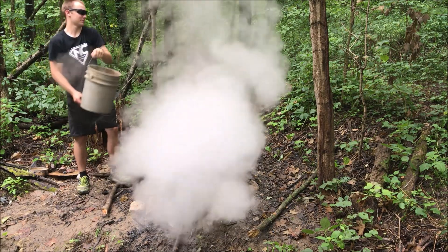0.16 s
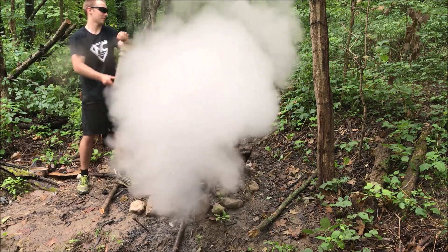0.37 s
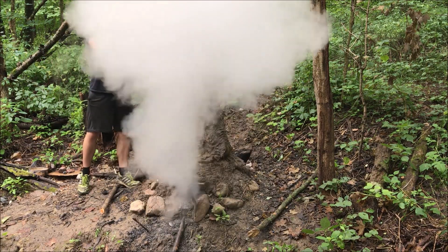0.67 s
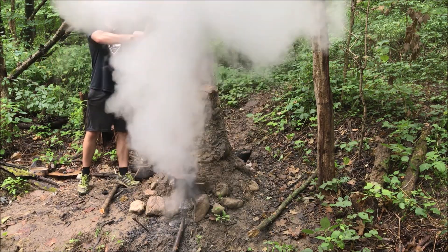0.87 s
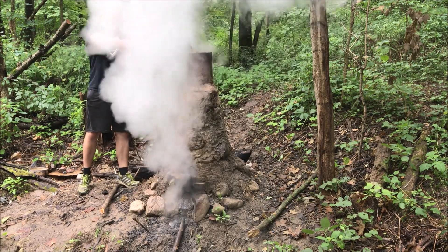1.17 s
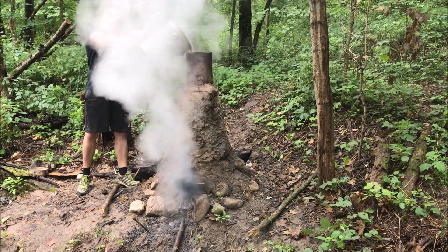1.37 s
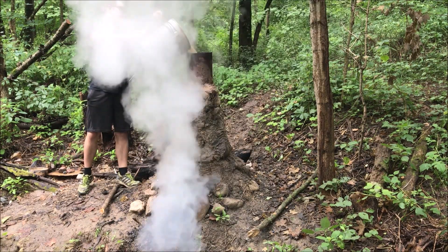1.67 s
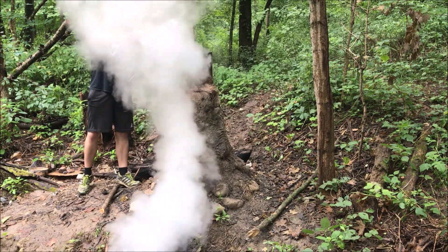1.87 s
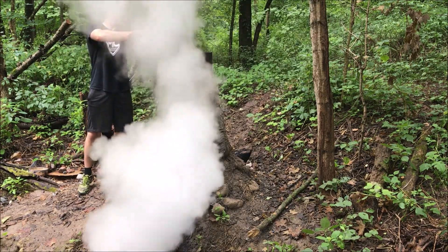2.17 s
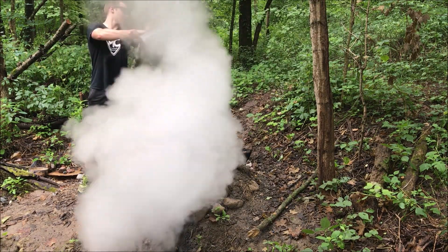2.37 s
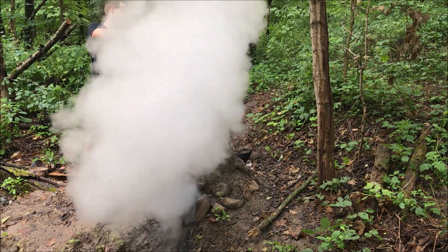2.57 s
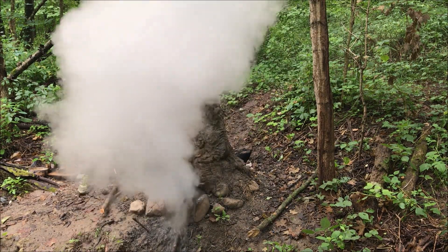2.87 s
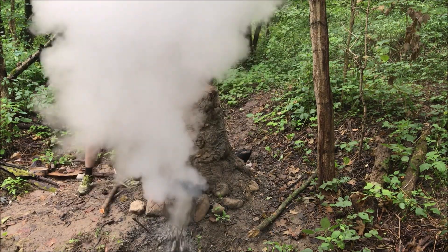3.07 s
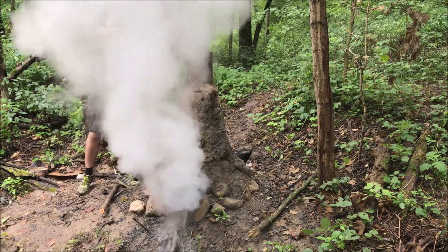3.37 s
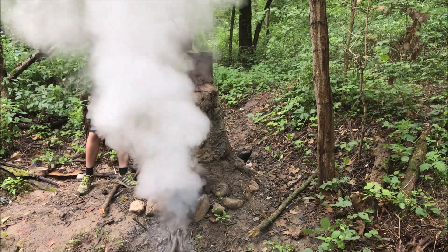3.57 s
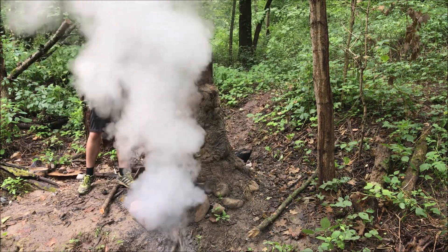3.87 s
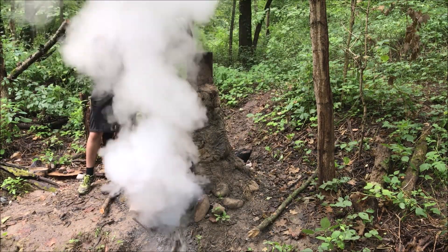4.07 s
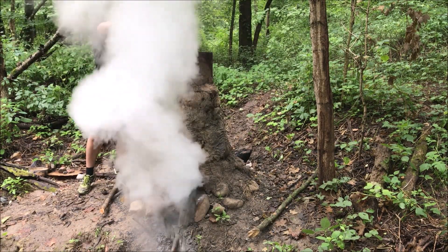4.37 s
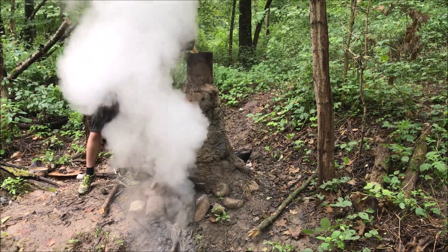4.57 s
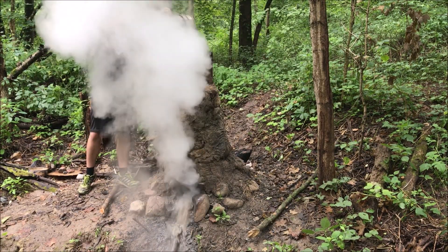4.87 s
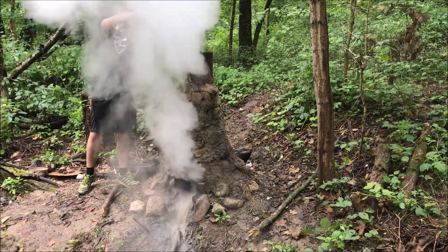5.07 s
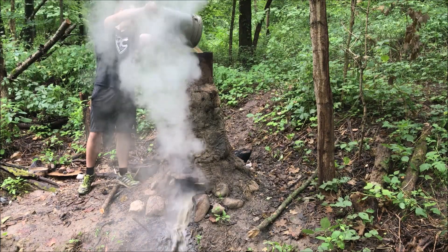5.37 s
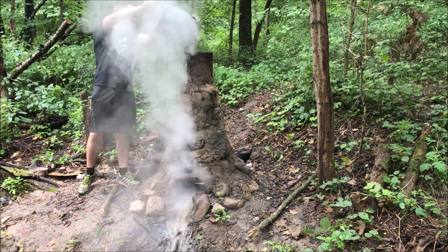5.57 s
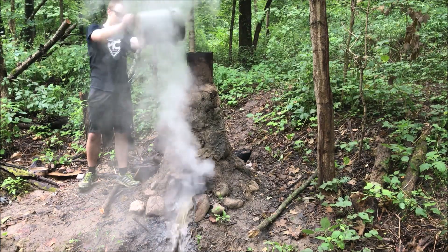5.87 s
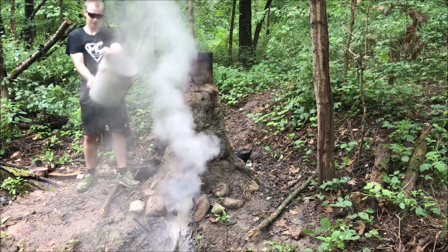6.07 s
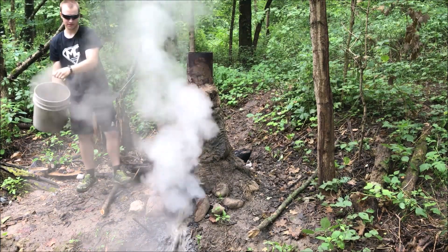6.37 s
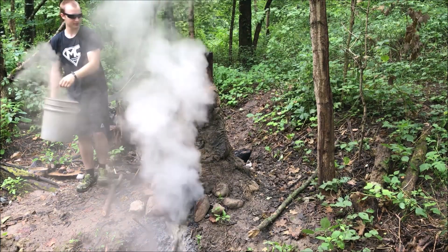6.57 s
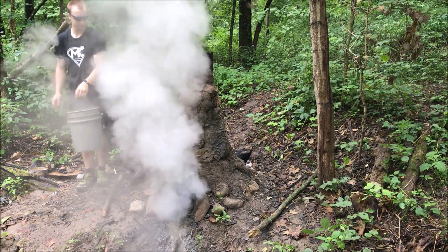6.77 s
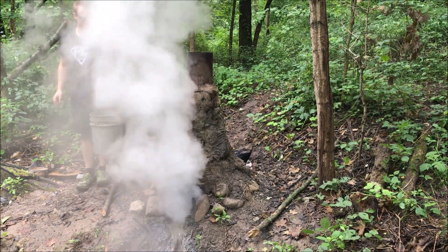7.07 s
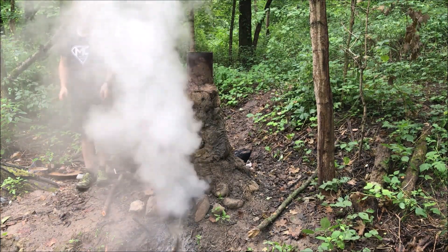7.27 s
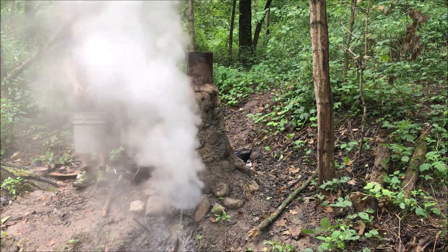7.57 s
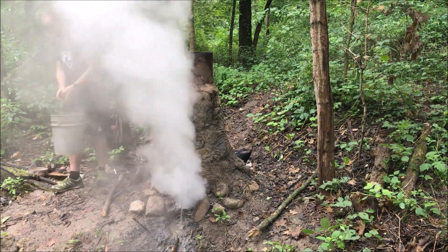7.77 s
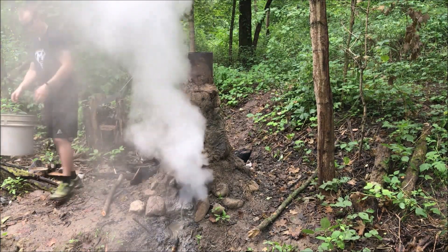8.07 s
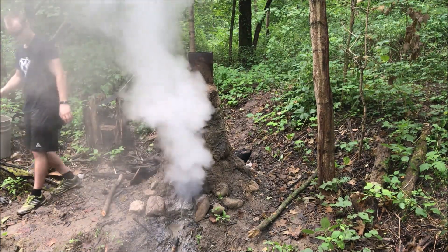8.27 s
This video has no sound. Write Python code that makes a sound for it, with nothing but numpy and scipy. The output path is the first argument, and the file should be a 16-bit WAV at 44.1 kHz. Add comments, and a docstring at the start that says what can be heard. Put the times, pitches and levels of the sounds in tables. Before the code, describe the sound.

A faint simmering hiss over very quiet woodland rustle opens the scene, with two tiny rock ticks at 0.3 and 0.6 s. At about 1.05 s water strikes red-hot stones: a snap and pops, then rumbling, gurgling boil and gushes of spitting steam. A violent cluster of cracks and hollow steam bursts peaks around 1.65 s, with scattered pops to 2.5 s. Faint falling whistles come near 2.7 s; a hard pop at 3.2 s is followed at once by a thin, dipping and rising bird chirp. A dense volley of thumps and cracks runs 3.8-4.1 s as the sizzle grows brighter. Two snaps come near 4.5 s. Pouring stops around 5.4 s; the boil fades while hiss persists. At 6.2-6.3 s a wire handle clacks and bounces on the hollow plastic pail. Sparse ticks punctuate the sizzle, fading by 8.4 s. Close outdoor microphone, little reverberation.

```python
"""Water poured from a bucket boils on red-hot rocks in a fire pit: collapsing bubbles rumble as filtered clicks.
Steam hisses as patchy noise with ticking drops; trapped steam bursts as single air swings off a tree stump.
Splitting rocks ring in decaying modes with noisy chips, and the handle clacks on the ringing pail.
A small bird chirps in gliding whistles, after faint falling tones, over the faint noise of the wood."""
import sys
import numpy as np
from scipy import signal
from scipy.fft import rfft, irfft, next_fast_len
from scipy.io import wavfile
from scipy.ndimage import uniform_filter1d, map_coordinates

SR = 44100
rng = np.random.default_rng(int(sys.argv[2]) if len(sys.argv) > 2 else 0)


def unload_audio(sound):
    """Save the sound as a 16-bit wav file, at the path given as the first command line argument."""
    columns = np.transpose(np.atleast_2d(sound))
    # keep every value between -1 and 1, then stretch to whole-number steps
    steps = np.round(np.clip(columns, -1, 1) * 32767)
    wavfile.write(sys.argv[1], SR, steps.astype(np.int16))


N = 371763
TOP_HZ = 15850  # upper band limit of the microphone, and the highest drop pitch


# Tone of the rumbling bubbles: freq_hz, relative_density_db
BOIL_SPECTRUM = [(24, -71), (40, -39), (99, -3.5), (135, -7), (326, 4), (358, 4.5), (473, -8), (519, -6.5),
                 (763, -11.5), (837, -26), (1090, -12.5), (1270, -58), (1600, -28), (2080, -22),
                 (3520, -120)]


def boiling():
    """While the water runs, big vapour bubbles collapse with a rumble and it spatters in the hollows."""
    pour_start_s, pour_end_s = 1.051, 5.43
    boil_db, simmer_db = -44.5, -66.5  # the simmer is a floor under the whole scene
    attack_s, sag_db_per_s, release_db_per_s = 0.018, 0.3, 16
    t = np.arange(N) / SR
    attack = np.clip((t - pour_start_s) / attack_s, 0, 1)
    sag_db = sag_db_per_s * (t - pour_start_s)
    release_db = release_db_per_s * np.maximum(t - pour_end_s, 0)
    _, gush_db = swells()
    boil = attack * amp(boil_db - (sag_db + release_db) + gush_db)
    level = np.hypot(boil, amp(simmer_db))

    heave_db = 1.6 * wobble(14)
    rumble = amp(heave_db) * coloured(kicks(rate=400, spread_db=3), BOIL_SPECTRUM)
    slosh_db = 2.3 * wobble(35)
    spatter = amp(-4.0 + slosh_db) * unit(filtered(kicks(rate=600, spread_db=3.5), pit))
    return level * (rumble + spatter)


# The sizzle grows as more stone gets wet, then dies away: time_s, level_db
SIZZLE_LEVEL = [(0, -58.5), (.98, -58.5), (1.08, -53.5), (2.45, -51.5), (2.7, -48.5), (3.9, -44),
                (5.05, -44.5), (5.45, -42.5), (6.45, -44.5), (7.05, -46.5), (8.05, -56), (8.43, -58)]
# Tone of the steam hiss: freq_hz, relative_density_db
HISS_SPECTRUM = [(60, -36), (410, -11), (700, -4), (850, -7), (955, -3), (1430, -3.5), (1730, -1),
                 (3320, 0.5), (4520, 0.5), (5150, 0), (7700, 1), (9720, -11.5), (12100, -17.5),
                 (15500, -27)]
# Tone of the fine spray: freq_hz, relative_density_db
SPRAY_SPECTRUM = [(3000, -5), (7000, -2.5), (9000, 7.5), (9900, 3), (11000, 8.5), (12200, 7.5),
                  (14000, 6.5), (15800, 1)]
# Brief dropouts in the level of the hiss, spray and drops: centre_s, half_length_s, change_db
HISS_DROPOUTS = [(2.369, .007, -15), (2.828, 0.015, -8), (6.729, 0.02, -6.5), (7.373, 0.0078, -4),
                 (7.833, .009, -4), (7.96, 0.0093, -5)]


def sizzling():
    """Steam hisses off the stone, with fine spray above it, drops spitting and sparse sharp ticks."""
    sizzle_db, = curves(SIZZLE_LEVEL)
    gush_db, _ = swells()
    over_db = sizzle_db + 44.5  # relative to the sizzle level at which spray_db and spit_db hold
    hiss = amp(sizzle_db + gush_db) * rush(HISS_SPECTRUM, patchy_db=1.2)

    mist = coloured(kicks(rate=4000, spread_db=6), SPRAY_SPECTRUM)
    vapour = rush(SPRAY_SPECTRUM, patchy_db=.6)
    flutter_db = .8 * wobble(14)
    spray_db = -44.5 + 0.77 * over_db  # dB per dB of sizzle
    fizz = amp(spray_db + gush_db + flutter_db) * unit(vapour + 0.97 * mist)

    drops = droplets(rate=300, centre_hz=4006, scatter=0.45, cycles=18.0, spread_db=2.0)
    ticks = droplets(rate=100, centre_hz=7500, scatter=.38, cycles=1.8, spread_db=4.5)
    sputter_db = 2.2 * wobble(28)
    spit_db = -49 + 0.91 * over_db
    gush_share = .7  # how much of a gush's swell the drops follow
    spit = amp(sputter_db + spit_db + gush_share * gush_db) * unit(drops + ticks)

    t = np.arange(N) / SR
    dropout_db = sum(db * np.exp(-((t - s) / half_s) ** 2) for s, half_s, db in HISS_DROPOUTS)
    return (hiss + fizz + spit) * amp(.55 * wobble(25) + dropout_db)


def droplets(rate, centre_hz, scatter, cycles, spread_db):
    """Drops flashing to steam: each a sine tick that decays over a number of cycles, about rate a second."""
    count = 6000  # candidates, of which a random share sounds
    draw, t = rng.standard_normal((count, 2)), np.arange(SR // 300) / SR
    start, chance = rng.random((2, count))
    hz = np.clip(centre_hz * np.exp(scatter * draw[:, :1]), 900, TOP_HZ)
    sounds = (chance < rate * N / SR / count)[:, None]
    size = amp(spread_db * np.minimum(draw[:, 1:], 2)) * sounds
    ticks = size * np.sin(2 * np.pi * hz * t) * np.exp(-hz * t / cycles)
    where = (start * N).astype(int)[:, None] + np.arange(len(t))
    return unit(np.bincount(where.ravel(), ticks.ravel(), N)[:N])


# Gushes of water reaching hot stone: centre_s, half_length_s, sizzle_change_db, boil_change_db
WATER_GUSHES = [(.47, 0.19, 2.5, 0), (1.133, 0.1, 8, 6.5), (1.34, 0.094, 6.5, 4.5), (1.663, 0.05, 9.5, 5.5),
                (1.86, 0.081, 4.5, 9), (2.138, 0.098, 8, 3), (3.3, 0.092, 1, 2), (3.992, 0.062, -2.5, 13.5)]


def swells():
    """Bell-shaped level changes in dB that the gushes give to the sizzle and to the boiling."""
    t = np.arange(N) / SR
    return sum(np.outer([sizzle_db, boil_db], np.exp(-((t - s) / half_s) ** 2))
               for s, half_s, sizzle_db, boil_db in WATER_GUSHES)


# Steam bursts: start_s, level_db, pitch_hz, front_edge_hz, spatter_db
STEAM_BURSTS = [(1.063, -23.5, 382, 1100, -26), (1.078, -37, 478, 1400, -23), (1.095, -31, 400, 1600, -25),
                (1.098, -32, 150, 800, -30), (1.3, -31, 140, 700, -43), (1.398, -25, 270, 700, -42),
                (1.6243, -16, 340, 1000, -23), (1.6404, -28, 330, 1100, -36),
                (1.6588, -12.5, 250, 800, -23), (1.669, -3.5, 475, 1100, -22),
                (1.6825, -16, 623, 1600, -19), (1.69, -23, 455, 1400, -18), (1.9174, -22, 330, 550, -50),
                (1.9327, -22, 380, 600, -48), (2.0837, -25.5, 380, 1200, -27),
                (2.0942, -15, 434, 1900, -20.5), (2.319, -26, 438, 1600, -28),
                (3.21, -11.5, 477, 1700, -29), (3.655, -39, 620, 1200, -30),
                (3.8077, -11.5, 390, 1900, -12), (3.8253, -7.5, 250, 1100, -15),
                (3.8129, -21, 110, 400, -34), (3.8329, -12.5, 140, 400, -20),
                (3.8472, -15.5, 170, 900, -30), (3.8548, -14.5, 433, 1700, -22),
                (3.8704, -16.5, 440, 1200, -24), (3.877, -27, 350, 1100, -24), (3.958, -26, 270, 550, -42),
                (3.9665, -16.5, 185, 650, -26), (3.979, -27, 250, 800, -33), (3.993, -20, 200, 600, -25),
                (4.0046, -9, 125, 520, -17), (4.019, -30, 110, 500, -32), (4.037, -30, 130, 900, -33),
                (4.062, -25, 360, 1100, -20), (4.08, -14.5, 383, 1200, -37)]
# Tone of the water spat out by a burst: freq_hz, relative_level_db
SPATTER_SPECTRUM = [(60, -30), (300, 15), (1100, 13), (1400, -17), (1900, 6), (2300, -12), (3100, -3),
                    (3900, -2), (14000, -36)]


def bursts():
    """Trapped steam lets go: the air swings once, the stump returns it and water spatters."""
    vent_hz = 85  # a small steam vent radiates little below this
    stump_s, stump_share = 0.002787, 0.55  # echo delay and strength
    stump_low_hz, stump_top_hz = 263, 2200  # longer waves pass round it, shorter ones scatter off its bark
    out, t = np.zeros(N), np.arange(SR // 12) / SR
    for s, db, hz, front_hz, spatter_db in STEAM_BURSTS:
        delay_s = stump_s * rng.normal(1, .025)

        def path(f):
            echo_band = f ** 4 / (f ** 4 + stump_low_hz ** 4) / (1 + 1j * f / stump_top_hz)
            stump = 1 + stump_share * np.exp(-2j * np.pi * f * delay_s) * echo_band
            soften = 1 / (1 + 1.2j * f / front_hz - (f / front_hz) ** 2)  # a low edge blunts the front
            thin = f * f / (f * f + vent_hz ** 2)
            return stump * (1 + .42 * pit(f)) * soften * thin

        push = filtered(swing(t, hz), path)
        spray = rng.standard_normal(len(t)) * amp(-60 * t / .022)
        spray = filtered(spray, lambda f: amp(along(SPATTER_SPECTRUM, f)))
        add(out, s, amp(db) * peaked(push) + amp(spatter_db) * peaked(spray))
    return out


def swing(t, hz):
    """One swing of the air about a pitch: three lobes with no net flow."""
    u = 2 * np.pi * hz * t
    return u * (u * u - 6 * u + 6) * np.exp(-u)


# Rocks cracking: start_s, pitch_hz, ring_db, chips_db, knock_db, chips_t60_s
ROCK_CRACKS = [(0.329, 2800, -36.5, -37, -39.5, 0.014), (0.616, 2330, -39, -48, -60, .018),
               (1.092, 3230, -24, -23, -21.5, 0.035), (1.5943, 2880, -36, -25, -30, 0.022),
               (1.608, 2930, -31, -26, -27, 0.017), (1.6541, 3120, -17.5, -17, -10.5, 0.014),
               (1.6585, 3020, -25, -19, -27, 0.0089), (1.662, 3500, -25, -15, -17, 0.014),
               (1.6685, 3030, -27, -22, -38, 0.011), (1.6715, 3040, -25, -26, -40, .012),
               (1.683, 2970, -27, -32, -33, .01), (1.6867, 3100, -23, -21, -29, 0.025),
               (1.767, 2370, -33, -27.5, -47, .012), (1.7903, 2810, -29, -28, -28, .014),
               (1.8075, 2530, -30, -32, -33, 0.014), (1.8877, 1840, -30, -34, -34, 0.02),
               (1.9301, 2300, -19.5, -19.5, -24, 0.028), (1.9326, 3670, -22, -24, -34, 0.026),
               (2.0888, 3000, -30, -21.5, -26, 0.017), (2.3353, 2450, -23, -24, -27, 0.02),
               (2.341, 2760, -31, -23, -28, .018), (2.481, 3100, -35, -36, -55, .018),
               (3.2102, 2630, -21, -32, -31, 0.0099), (3.801, 2620, -29, -20.5, -24, 0.019),
               (3.8078, 1920, -19.5, -19, -23, 0.014), (3.8161, 3020, -35, -25, -16, 0.024),
               (3.825, 1910, -22, -21, -30, 0.0081), (3.842, 3080, -28, -27, -24, 0.014),
               (3.846, 2030, -25, -29, -19.5, 0.016), (3.856, 1930, -22, -30, -34, .018),
               (3.89, 1490, -27, -40, -25, .02), (3.998, 2520, -31, -20, -19, 0.017),
               (4.0024, 3030, -28, -22, -14.5, 0.015), (4.042, 2570, -30, -32, -31, .02),
               (4.062, 2480, -27, -25, -23, 0.018), (4.0728, 2140, -14.5, -17, -17, 0.017),
               (4.0797, 1960, -17, -17, -23, 0.02), (4.5133, 2220, -24.5, -28, -40, 0.013),
               (4.576, 4500, -27.5, -29, -55, 0.022), (5.561, 3970, -31, -34, -61, 0.013),
               (6.8625, 2310, -33, -32, -55, .02), (7.214, 2340, -23.5, -23, -46, 0.014),
               (7.8864, 5000, -37, -26.5, -51, 0.019), (7.929, 5070, -42, -39, -55, 0.011)]
# Modes of a rock: ratio_to_pitch, relative_level_db, t60_s
ROCK_MODES = [(.55, -31, .014), (.8, -24, .015), (1.001, 11, 0.028), (1.16, 6, 0.016), (1.6, -2, 0.0087)]
# Tone of the flying chips: freq_hz, relative_level_db
CHIPS_SPECTRUM = [(500, -39), (1900, 7), (3000, 1.5), (4000, 2), (6000, -2.5), (14000, -5.5)]


def cracks():
    """A chilled rock splits: its modes ring briefly, chips fly and the pit knocks."""
    out, t = np.zeros(N), np.arange(SR // 12) / SR

    def mode(hz, level_db, t60_s):
        decay = amp(level_db + 2 * rng.standard_normal() - 60 * t / t60_s)
        return decay * np.sin(2 * np.pi * hz * rng.normal(1, .014) * t)

    for s, hz, ring_db, chips_db, knock_db, t60_s in ROCK_CRACKS:
        ring = sum(mode(hz * ratio, level_db, life_s) for ratio, level_db, life_s in ROCK_MODES)
        spread = 1 - np.exp(-t / (0.2 * t60_s))  # a long split takes a moment to run through the stone
        rough_db = 3.4 * rng.standard_normal(len(t))
        grit = rng.standard_normal(len(t)) * spread * amp(rough_db - 60 * t / t60_s)
        knock = filtered(grit, lambda f: pit(f) / (1 + 1j * f / 1500))
        chips = filtered(grit, lambda f: amp(along(CHIPS_SPECTRUM, f)))
        add(out, s, amp(ring_db) * peaked(ring) + amp(chips_db) * peaked(chips) + amp(knock_db) * peaked(knock))
    return out


# Hollows among the rocks: centre_hz, width_hz, relative_level_db
PIT_HOLLOWS = [(246, 152, 14.5), (293, 390, 8), (560, 21, -18), (753, 29, 7), (920, 120, 8.5),
               (1132, 32, 13), (1457, 39, 6), (1660, 170, 4), (2500, 200, 9.5), (2987, 31, 14.5)]


def pit(hz):
    """Response of the hollows among the rocks: a sum of band-pass resonances."""
    return sum(amp(db) * 1j * hz * width_hz / (fc * fc - hz * hz + 1j * hz * width_hz)
               for fc, width_hz, db in PIT_HOLLOWS)


# The handle knocking on the bucket: start_s, level_db, clack_pitch_hz, pail_relative_to_wire_db
HANDLE_KNOCKS = [(6.1803, -17.5, 2960, -13), (6.189, -28, 3080, 2), (6.212, -27.5, 2700, -2),
                 (6.229, -29, 3050, 0), (6.2365, -34, 2700, -6), (6.247, -31, 3000, -13),
                 (6.2637, -13.5, 2660, -7), (6.2689, -25, 2600, 4), (6.282, -30, 2900, -3),
                 (6.285, -32, 3200, -7), (6.323, -40, 2700, 11)]
# Modes of the bucket: freq_hz, relative_level_db, t60_s
PAIL_MODES = [(417, 0, 0.069), (560, -9, 0.035), (884, 0.5, 0.064), (1085, 1.5, 0.045), (1325, -6, .04),
              (1600, -11, .03), (1750, -5, 0.038), (2510, -4, 0.044), (2950, -9, .03), (3370, -18, 0.033),
              (4220, -10, .025)]


def bucket():
    """The wire handle clacks as it bounces on the empty plastic pail, which rings under it."""
    click_spectrum = [(100, -35), (400, -4), (2800, 5), (5000, -6), (14000, -11)]  # freq_hz, relative_level_db
    out, t = np.zeros(N), np.arange(SR // 6) / SR

    def mode(hz, db, t60_s):
        decay = amp(db + rng.normal(0, 1.2) - 60 * t / t60_s)
        return decay * np.sin(2 * np.pi * hz * rng.normal(1, .025) * t)

    for s, db, clack_hz, pail_db in HANDLE_KNOCKS:
        # the pitch of the upper ring depends on where the handle strikes
        wire = mode(1970, 0, 0.021) + mode(clack_hz, -1, 0.019)
        wire = wire * (1 - np.exp(-t / 0.00043))
        pail = sum((-1) ** k * mode(*row) for k, row in enumerate(PAIL_MODES))
        click = rng.standard_normal(len(t)) * amp(-60 * t / 0.042)
        click = filtered(click, lambda f: amp(along(click_spectrum, f)))
        knock = .7 * peaked(wire) + amp(pail_db) * .7 * peaked(pail) + .45 * peaked(click)
        add(out, s, amp(db) * knock)
    return out


# Upper voice of the chirp: time_s, pitch_hz, level_db
CHIRP_UPPER = [(3.218, 7500, -54), (3.235, 6450, -54), (3.252, 6200, -43), (3.268, 5800, -51),
               (3.284, 5850, -46), (3.293, 6240, -46), (3.312, 6860, -47), (3.34, 7450, -49),
               (3.356, 7620, -44), (3.368, 7550, -60)]
# Lower voice of the chirp: time_s, pitch_hz, level_db
CHIRP_LOWER = [(3.245, 5800, -58), (3.268, 5100, -45), (3.28, 5000, -48), (3.297, 5380, -43),
               (3.306, 5450, -52), (3.315, 5650, -46), (3.326, 6150, -49), (3.334, 6200, -43),
               (3.35, 6250, -58)]


def bird():
    """One thin two-voiced chirp whose whistles dip and rise, repeated by the trunks."""
    return among_trunks(voice(CHIRP_UPPER) + voice(CHIRP_LOWER))


def voice(rows):
    """One rough, fluttering whistle along a curve of time, pitch and level."""
    hz, db = curves(rows)
    t = np.arange(N) / SR
    phase = 2 * np.pi * np.cumsum(hz * (1 + .013 * wobble(600))) / SR
    return amp(db + 2.2 * wobble(160)) * np.sin(phase) * (t > rows[0][0]) * (t < rows[-1][0])


# Faint falling whistle tones: centre_s, pitch_hz, level_db
FALLING_TONES = [(2.665, 8000, -50), (2.677, 6300, -48), (2.735, 6230, -52), (2.742, 5200, -47),
                 (2.786, 6180, -44)]


def falling_tones():
    """A few faint falling whistle tones: sines gliding down under bell-shaped envelopes."""
    half_s, fall_hz_per_s = 0.015, 2800
    t, out = np.arange(N) / SR, np.zeros(N)
    for s, hz, db in FALLING_TONES:
        u = t - s
        whistle = np.sin(2 * np.pi * (hz - fall_hz_per_s * u / 2) * u)
        out += amp(db) * np.exp(-(u / half_s) ** 2) * whistle
    return among_trunks(out)


def among_trunks(x):
    """A sound with one distinct echo and the scatter of the trees."""
    echo_s = .043
    return filtered(x, lambda f: 1 + .25 * np.exp(-2j * np.pi * f * echo_s)) + .6 * trees(x)


# Decay of the sound scattered among the trees: freq_hz, t60_s
TREE_DECAY = [(150, 0.25), (1000, 0.14), (4000, 0.099), (12000, 0.0058)]


def trees(x):
    """Scatter from trunks and leaves, as a decaying noise tail; the treble dies first."""
    hz, t, z = signal.stft(rng.standard_normal(SR // 2), SR, nperseg=256)
    decay = amp(-60 * t / along(TREE_DECAY, hz)[:, None])
    tail = signal.istft(z * decay, SR, nperseg=256)[1]
    return signal.fftconvolve(x, tail / np.linalg.norm(tail))[:N]


# Tone of the rustling wood: freq_hz, relative_density_db
FOREST_SPECTRUM = [(18, -52), (30, -36), (59, -20), (78, -14), (111, -0.5), (170, -6.5), (257, -10.5),
                   (350, -9.5), (470, -16.5), (700, -16), (880, -19), (1120, -11), (1880, -18),
                   (4000, -23.5), (5200, -73)]


def leaves():
    """The faint rustle of the wood: patchy noise."""
    return amp(-59.5) * rush(FOREST_SPECTRUM, patchy_db=2.2)


def rush(spectrum, patchy_db):
    """Shaped noise of rms 1, with patches of random gain over time and frequency."""
    z = signal.stft(rng.standard_normal(N), nperseg=512)[2]
    field = uniform_filter1d(rng.standard_normal(z.shape), size=7, axis=0)
    field = uniform_filter1d(field, size=6, axis=1)
    noise = signal.istft(z * amp(patchy_db * unit(field)), nperseg=512)[1][:N]
    return coloured(noise, spectrum)


def kicks(rate, spread_db):
    """Impulses at random moments, about rate a second, of random sizes and signs."""
    sizes = rng.standard_normal(N)
    return (rng.random(N) < rate / SR) * amp(spread_db * np.clip(sizes, -2, 2)) * rng.choice([-1, 1], N)


def wobble(rate):
    """A smooth random curve, rate knots a second."""
    return map_coordinates(rng.standard_normal(int(N * rate / SR) + 4), [np.arange(N) * rate / SR])


def curves(rows):
    """One value per sample for each column after the time."""
    s, *cols = np.transpose(rows)
    return [np.interp(np.arange(N) / SR, s, c) for c in cols]


def along(points, hz):
    """Interpolates (frequency, value) points on a log axis."""
    f, v = np.transpose(points)
    return np.interp(np.log(hz + 1), np.log(f + 1), v)


def filtered(x, response):
    """x times a complex response of frequency."""
    m = next_fast_len(len(x) + SR // 8)
    return irfft(rfft(x, m) * response(np.fft.rfftfreq(m, 1 / SR)), m)[:len(x)]


def coloured(x, spectrum):
    """x shaped by a spectrum, at rms 1."""
    return unit(filtered(x, lambda hz: amp(along(spectrum, hz))))


def add(track, s, sound):
    """Mixes a sound into the track at time s."""
    part = track[max(round(s * SR), 0):][:len(sound)]
    part += sound[:len(part)]


def amp(db):
    """Decibels to gain."""
    return 10 ** (np.asarray(db) / 20)


def unit(x):
    """Scaled to rms 1."""
    return x / np.sqrt(np.mean(x ** 2) + 1e-20)


def peaked(x):
    """Scaled to peak 1."""
    return x / np.abs(x).max()


def scene():
    """Pops and boiling water over the faint rustle of the wood, alike in both channels."""
    pops = bursts() + cracks() + bucket()
    scatter = amp(-16) * trees(pops)
    mono = boiling() + sizzling() + pops + scatter + bird() + falling_tones() + leaves()
    return np.array([mono, mono])


def record(dry):
    """The microphone sheds deep bass and keeps nothing above its band limit."""
    low_cut = lambda hz: (1j * hz / (1j * hz + 45)) ** 2
    return np.array([filtered(ch, lambda hz: low_cut(hz) * (hz < TOP_HZ)) for ch in dry])


dry = scene()
out = record(dry)
unload_audio(out)
```